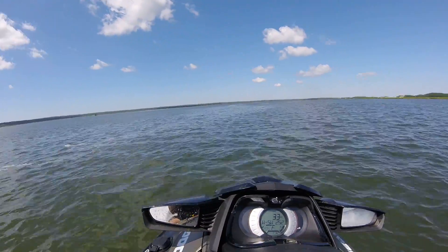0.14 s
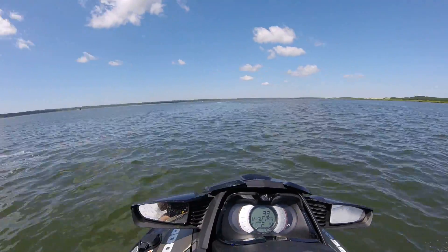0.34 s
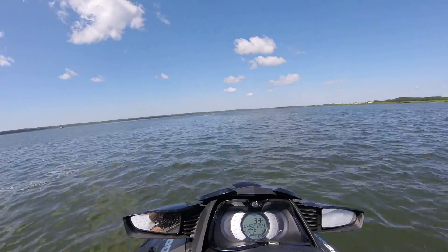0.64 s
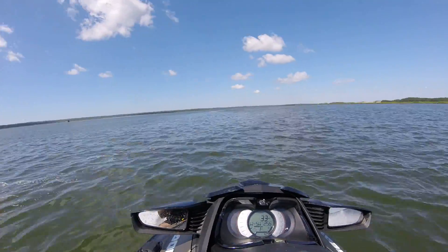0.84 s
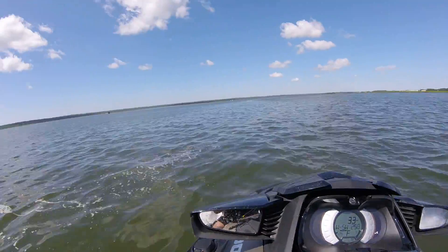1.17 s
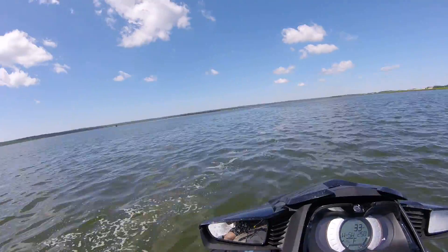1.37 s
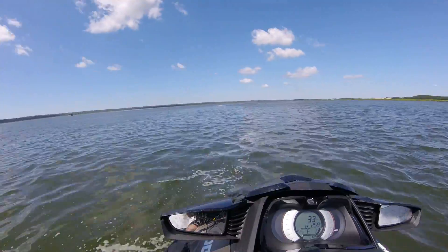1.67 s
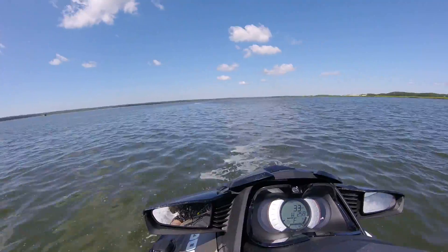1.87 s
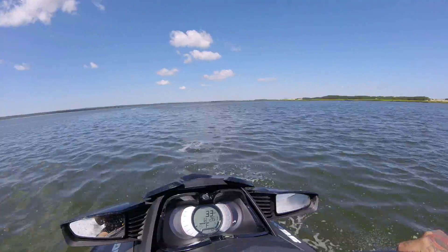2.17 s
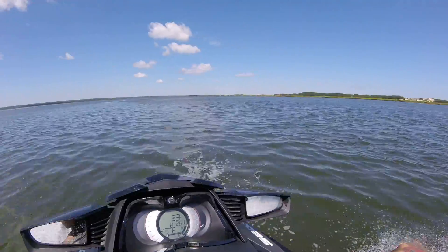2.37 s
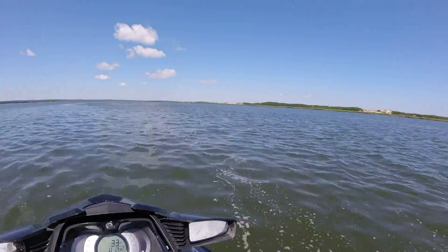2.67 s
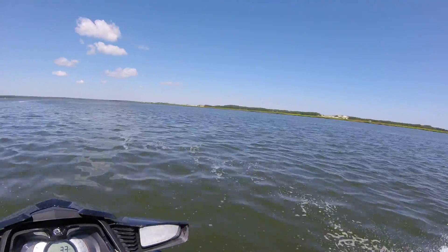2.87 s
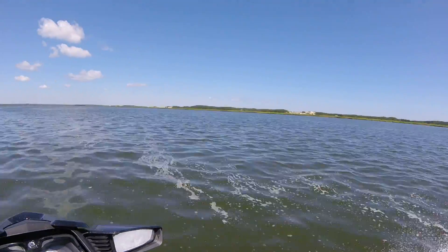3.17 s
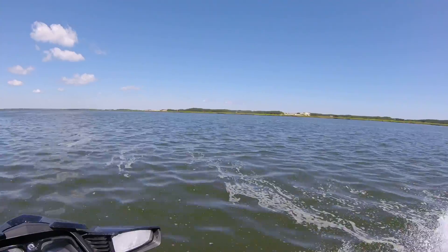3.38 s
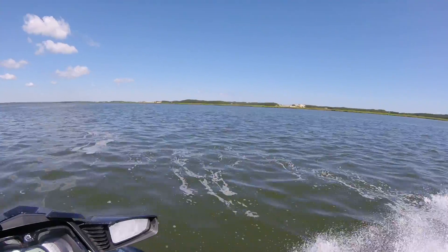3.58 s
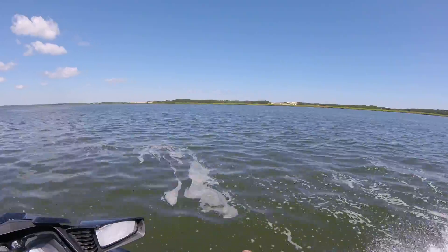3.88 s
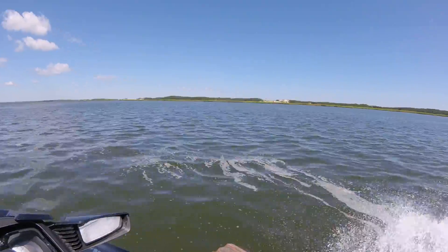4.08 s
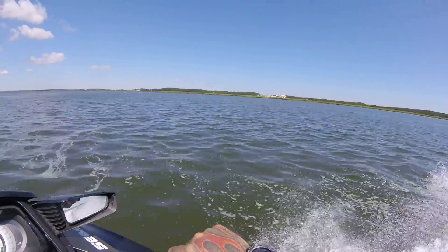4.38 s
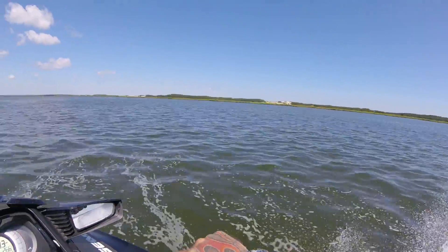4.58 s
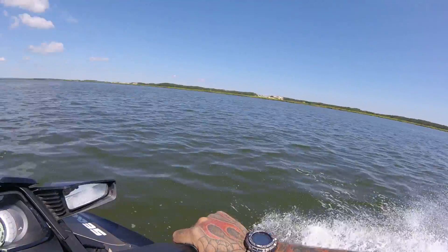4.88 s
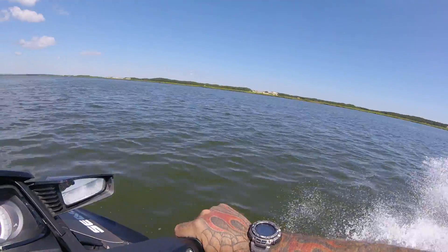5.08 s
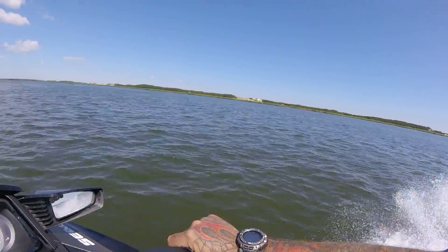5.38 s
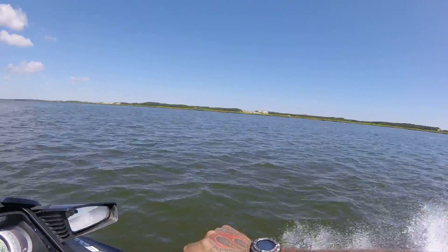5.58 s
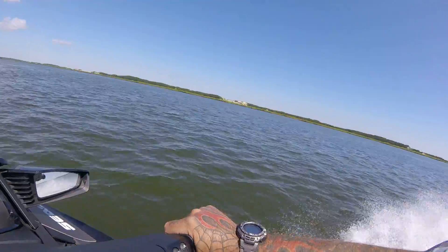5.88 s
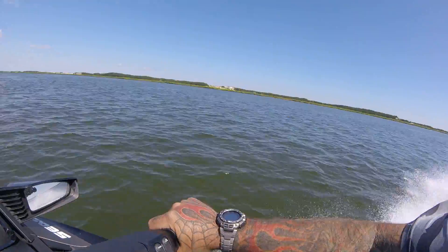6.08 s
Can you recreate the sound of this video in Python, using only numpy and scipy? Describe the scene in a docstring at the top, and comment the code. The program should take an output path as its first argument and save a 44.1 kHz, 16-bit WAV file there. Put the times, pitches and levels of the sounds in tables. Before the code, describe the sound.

A personal watercraft engine drones steadily over open water, with wind thumping the microphone, brief dry rattles and bursts of hissing spray.

```python
"""A three-cylinder personal watercraft engine drones at a steady cruise, heard from the rider's head. Sine
engine orders sound over noise-built exhaust roar, hull wash, spray, whistling hiss and fizz. Wind is low noise
with hard thumps; dry ticks rattle early on; splashes swell the roar and water noise. At 4.15 s the head turns
aside: engine and treble are shaded, and wind buffets the microphone more."""
import sys
import numpy as np
from scipy import signal
from scipy.fft import rfft, irfft
from scipy.io import wavfile
from scipy.ndimage import uniform_filter1d

SR = 44100
rng = np.random.default_rng(int(sys.argv[2]) if len(sys.argv) > 2 else 0)


def put_to_file(sound):
    """Save the sound as 16-bit audio at rate SR, in the file named by the first command-line argument."""
    columns = np.atleast_2d(sound).T  # one column per channel
    safe = np.clip(columns, -1, 1)
    whole_steps = np.round(safe * 32767)
    wavfile.write(sys.argv[1], SR, whole_steps.astype(np.int16))


N = 275184
TIME_S = np.arange(N) / SR

# Levels are those entering record().
# engine levels: (time [s], second crank order [dB], third crank order [dB], airborne orders [dB])
DRONE_LEVELS = [(0, -22, -15.5, -34.5), (.1, -19.5, -17, -26.5), (.4, -18.5, -17.5, -27),
                (.7, -18.5, -17, -26), (1.1, -18, -18, -27), (1.35, -26.5, -22, -24.5),
                (1.67, -16.5, -18, -26), (1.95, -20, -20, -24.5), (2.15, -17.5, -16.5, -24.5),
                (2.65, -22, -18.5, -31), (3.3, -19.5, -19, -32), (3.7, -22, -18.5, -34.5),
                (4.03, -22.5, -17.5, -28), (4.12, -21, -19, -34), (4.22, -29, -25, -39),
                (4.65, -25, -21.5, -42), (5.1, -28, -21, -39), (5.45, -22, -21, -36),
                (5.6, -26.5, -25, -32), (5.77, -25, -22, -39), (6.03, -26.5, -21.5, -34),
                (6.24, -25, -25, -47)]
# weaker low orders: (multiple of cycle rate, level re slow trend of second crank order [dB])
LOW_ORDERS = [(3, -8), (5, -17)]
# airborne orders: (multiple of cycle rate, level re airborne level [dB])
AIR_ORDERS = [(8, -2), (9, -4.5), (10, -17), (12, -19.5), (13, -24), (14, -16.5), (16, -23.5), (17, -24),
              (19, -25), (20, -26), (25, -28)]
# water and exhaust beneath the splashes: (time [s], exhaust roar [dB], hull wash [dB])
RUSH_LEVELS = [(0, -37, -47.5), (.6, -34.5, -47), (.9, -36.5, -47), (1.2, -33.5, -43), (1.5, -37.5, -45.5),
               (1.95, -33, -40), (2.2, -35, -43.5), (2.95, -35, -47), (3.4, -32, -47.5), (3.55, -37, -49),
               (4.12, -33, -47), (4.25, -38, -52), (4.9, -39, -50.5), (5.7, -36.5, -50), (5.84, -40.5, -48),
               (5.93, -32, -46), (6.24, -38.5, -51)]
# wind on the microphone: (time [s], level [dB])
WIND_LEVELS = [(0.0, -23), (0.19, -27), (0.59, -27.5), (1.18, -24.5), (1.51, -24.5), (2.22, -23.5),
               (2.83, -22.5), (3.18, -27), (3.34, -19), (3.67, -23), (4.31, -20), (4.5, -19), (4.69, -24.5),
               (5.47, -17.5), (5.7, -20), (5.87, -23), (6.07, -18.5), (6.24, -22)]
# sheets of spray thrown past the microphone: (start [s], length [s], spray [dB],
# then re spray: low roar [dB], wash [dB], hiss [dB])
SPLASHES = [(1.873, 0.2, -54, 12, 1, 1), (2.202, 0.11, -42, 12.5, 1, -1), (2.27, .2, -41.5, 13.5, 7, -1.5),
            (2.442, 0.2, -42, 11, 4, -4), (2.59, 0.18, -41.5, -5, 4, -8), (2.724, .14, -44.5, 5, 7.5, -0.5),
            (2.858, 0.075, -43, 10, -2, -2), (2.92, 0.23, -58, 6, -1, 8), (3.425, .035, -57, 24, 0, -3),
            (4.17, .06, -51, 10, -2, -13), (4.273, 0.2, -48.5, 0, -5, -12), (4.436, .2, -53.5, 0, -9, -6),
            (4.996, 0.18, -47, 5, -0.5, -16), (5.15, .15, -45, 4, 2, -16), (5.27, 0.14, -42, 0, 1.5, -12),
            (5.375, 0.17, -45.5, 1, -0.5, -10), (5.465, 0.16, -41.5, 5, 1, -15),
            (5.601, 0.14, -42.5, 0, -3, -12), (5.838, 0.054, -48, -1, 0, -9),
            (5.933, 0.085, -43.5, 6, -3, -8), (5.996, 0.074, -49, 15, 0, -4), (6.047, 0.13, -46, 1, 1, -7),
            (6.135, .2, -42.5, 10.5, -2, -5.5)]
# small dry ticks, perhaps a plastic part rattling: (peak time [s], envelope peak [dB], pitch [Hz])
RATTLES = [(0.44, -33, 2520), (0.455, -34, 2200), (0.4654, -36, 2300), (0.5317, -41, 2660),
           (0.592, -31, 2410), (0.9926, -35, 2460), (1.0151, -35, 2650), (1.033, -30, 2340),
           (1.04, -34, 2400), (1.058, -32, 2500), (1.0804, -38, 2730), (1.9275, -27, 2640),
           (1.975, -32, 2380), (2.003, -28, 2360), (2.03, -28, 2660), (2.162, -29, 2660),
           (2.1806, -24, 2840)]
# single hard thumps of wind: (peak time [s], envelope peak [dB], pitch [Hz], bell time constant [s])
THUMPS = [(0.779, -17, 87, 0.016), (1.149, -14.5, 57, 0.026), (2.639, -16.5, 58, 0.028),
          (3.199, -13, 37.7, 0.026), (3.499, -12, 26.7, 0.021), (3.759, -15, 26.9, 0.018),
          (3.929, -17, 80, 0.023), (4.139, -8.5, 94, 0.01), (4.209, -7.5, 35.0, 0.014),
          (4.279, -9, 80.7, 0.011), (4.309, -11.5, 35.0, 0.021), (4.389, -16.5, 37.7, 0.037),
          (4.879, -15, 58, 0.016), (5.019, -9.5, 32.8, 0.016), (5.289, -9.5, 94.2, 0.01),
          (5.469, -7, 55, 0.015), (5.499, -17, 26.7, 0.016), (5.619, -9, 59.7, 0.012),
          (5.679, -12, 50.5, 0.027), (5.939, -18, 48, 0.046), (6.039, -3, 76.5, 0.011),
          (6.099, -14, 43.1, 0.022)]

# Noise colours, each: (frequency [Hz], relative spectral density [dB per Hz])
# low engine noise
RUMBLE_COLOUR = [(70, -17), (120, -0.5), (165, -4.5), (215, 2), (260, -0.5), (310, -7), (450, -14),
                 (600, -38)]
# rings of the engine cover
CASING_COLOUR = [(1000, -18.5), (1120, -5), (1160, -2.5), (1210, -17.5), (1330, -10), (1450, 1.5),
                 (1540, -2), (1700, -26.5)]
# exhaust roar
ROAR_COLOUR = [(150, -18.5), (330, -2.5), (500, 1), (900, -5.5), (1300, -14), (2000, -37)]
# hull wash
WASH_COLOUR = [(600, -23.5), (1000, 2.5), (1450, 1), (1800, 1), (2400, -6), (3200, -21.5)]
# spray
SPRAY_COLOUR = [(1000, -20.5), (1900, -0.5), (2800, 4), (3600, -1.5), (5000, -6.5), (7000, -19.5),
                (9000, -31), (12000, -54)]
# hiss with a whistle near 6.5 kHz, perhaps the microphone port ringing
HISS_COLOUR = [(3000, -19), (4300, -8.5), (4800, -3.5), (5700, -5.5), (6200, -2.5), (6500, 2), (6800, -6.5),
               (7500, -18), (9000, -38)]
# finest spray
FIZZ_COLOUR = [(6500, -19), (7500, -2), (9300, -10), (10200, -17.5), (11000, -15), (12000, -29)]
# wind eddies
BUFFET_COLOUR = [(10, -7), (22, -0.5), (50, 1), (90, -2.5), (130, -6.5), (250, -12.5), (500, -30)]
# small ticks around each rattle
CHATTER_COLOUR = [(1700, -26), (2100, -6), (2500, 4), (2900, -6.5), (3400, -29)]

CYCLE_HZ = 46.63  # mean four-stroke cycle rate
TURN_S, TURN_LASTS_S = 4.15, 0.1
SPRAY_DB, HISS_DB, FIZZ_DB = -51.5, -49.5, -62.5
SPRAY_SHADE_DB, HISS_SHADE_DB, FIZZ_SHADE_DB = -3, -8, -8.5  # added by the turn
SPLASH_RISE_S, SPLASH_FALL_S, SPLASH_SAG_DB_PER_S = 0.029, 0.025, -7
SPLASH_FIZZ_DB = -29  # re splash spray
TICK_S = 0.0012  # bell time constant
EDGE_HZ = 12000
WANDER_RATE_HZ = 200  # points per second


def gain_of(db):
    """Amplitude gain of a level in dB."""
    return 10 ** (np.asarray(db) / 20)


def summed_db(*levels_db):
    """Level of unrelated noises together: their powers add."""
    return 10 * np.log10(sum(gain_of(db) ** 2 for db in levels_db))


def evened(x):
    """Scale to rms 1."""
    return x / np.sqrt(np.mean(x ** 2) + 1e-20)


def curves(rows):
    """Table columns joined by straight lines in time."""
    times_s, *columns = np.transpose(rows)
    return [np.interp(TIME_S, times_s, column) for column in columns]


def wander(top_hz):
    """Slow random curve of rms 1 with nothing at or above top_hz."""
    count = int(N / SR * WANDER_RATE_HZ) + 2
    spectrum = rfft(rng.standard_normal(count))
    below_top = np.fft.rfftfreq(count, 1 / WANDER_RATE_HZ) < top_hz
    slow = irfft(spectrum * below_top, count)
    return np.interp(TIME_S * WANDER_RATE_HZ, np.arange(count), evened(slow))


def noise(colour, size, patchy_db, flicker_db, band_hz):
    """Random short-time spectra with drifting patches and shared flicker; about rms 1 in band_hz."""
    frames, hz = 4 * N // size + 5, np.fft.rfftfreq(size, 1 / SR)
    real, imag, patches = rng.standard_normal((frames, len(hz), 3)).T
    patches = uniform_filter1d(patches, size=size // 64, axis=0)  # smooth over frequency
    patches = evened(uniform_filter1d(patches, size=5, axis=1))  # smooth over time
    flicker = evened(uniform_filter1d(rng.standard_normal(frames), size=3))

    colour_hz, colour_db = np.transpose(colour)
    shape = gain_of(np.interp(np.log(hz + 1), np.log(colour_hz), colour_db, -90, -90))
    modulation = gain_of(patchy_db * patches + flicker_db * flicker)
    spectra = (real + 1j * imag) * shape[:, None] * modulation
    sound = evened(signal.istft(spectra, nperseg=size, noverlap=size - size // 4)[1][:N])
    inside = (hz > band_hz[0]) & (hz < band_hz[1])
    return sound * np.sqrt((shape ** 2).sum() / (shape[inside] ** 2).sum())


def bursts(rows):
    """Cosine swings of random phase, each under a bell curve peaking at its time."""
    half = SR // 10
    out, t_s = np.zeros(N + SR), (np.arange(SR // 5) - half) / SR
    phases = rng.random((len(rows), 1))  # cycles
    for (peak_s, db, hz, bell_s), phase in zip(rows, phases):
        bell = gain_of(db) * np.exp(-(t_s / bell_s) ** 2)
        swing = bell * np.cos(2 * np.pi * (hz * t_s + phase))
        out[round(peak_s * SR) - half:][:len(t_s)] += swing
    return out[:N]


def turned():
    """Head turn: 0 facing forward, 1 turned aside."""
    return np.clip((TIME_S - TURN_S) / TURN_LASTS_S, 0, 1)


def order(multiple, cycles, waver_db):
    """One engine order: a sine that uneven firing makes waver in level and in phase."""
    phase_waver = 0.11 * waver_db * wander(14)  # rad
    angle = 2 * np.pi * (multiple * cycles + rng.random()) + phase_waver
    return np.sqrt(2) * np.sin(angle) * gain_of(waver_db * wander(18))


def orders(rows, cycles, waver_db):
    """Sum of the orders in a table."""
    return sum(gain_of(db) * order(multiple, cycles, waver_db) for multiple, db in rows)


def engine(cycles):
    """Drone: two strong hull-borne crank orders, with weaker orders and rough noise around them."""
    second_db, third_db, air_db = curves(DRONE_LEVELS)
    # second order and airborne parts flutter more after the turn
    flutter_db = (0.39 + 2.2 * turned()) * wander(11)
    second_gain = gain_of(second_db + flutter_db)
    third_gain = gain_of(third_db + 0.37 * wander(5))
    # two crank turns per cycle: crank orders 2 and 3 are cycle multiples 4 and 6
    strong = second_gain * order(4, cycles, 1.3) + third_gain * order(6, cycles, 0.6)

    low = orders(LOW_ORDERS, cycles, 1.4)
    rumble = gain_of(-4.0) * noise(RUMBLE_COLOUR, 2048, 0.97, 1.0, (100, 400))
    load_db = uniform_filter1d(second_db, size=SR // 4)  # slow trend only

    air = orders(AIR_ORDERS, cycles, 1.1)
    casing = gain_of(-20.0) * noise(CASING_COLOUR, 2048, 2.0, 0.4, (1000, 1700))
    air_flutter_db = (0.46 + 1.3 * turned()) * wander(8.8)
    return strong + (low + rumble) * gain_of(load_db) + (air + casing) * gain_of(air_db + air_flutter_db)


def rush(cycles):
    """Roar and hiss throb faintly with each crank turn and firing; wash, spray and fizz flicker freely."""
    roar_db, wash_db = curves(RUSH_LEVELS)
    surge = wander(14)  # shared unevenness
    splash_db, low_db, body_db, high_db = splashes() + 0.52 * surge
    roar_db = summed_db(roar_db + 0.6 * wander(14), low_db)
    wash_db = summed_db(wash_db + 0.5 * wander(6), body_db)
    spray_db = summed_db(SPRAY_DB + SPRAY_SHADE_DB * turned() + 0.53 * surge, splash_db)
    hiss_db = summed_db(HISS_DB + HISS_SHADE_DB * turned() + 0.17 * surge, high_db)
    fizz_db = summed_db(FIZZ_DB + FIZZ_SHADE_DB * turned(), splash_db + SPLASH_FIZZ_DB)

    # two crank turns and three firings per cycle
    throb = np.cos(4 * np.pi * cycles) + 0.7 * np.cos(6 * np.pi * cycles)
    roar = noise(ROAR_COLOUR, 1024, 0.9, 0.6, (480, 1100)) * (1 + 0.07 * throb)
    wash = noise(WASH_COLOUR, 512, 0.95, 0.46, (1300, 2000))
    spray = noise(SPRAY_COLOUR, 256, 1.0, 0.61, (2900, 4400))
    hiss = noise(HISS_COLOUR, 256, 1.1, 0.7, (5000, 7200)) * (1 + 0.035 * throb)
    fizz = noise(FIZZ_COLOUR, 256, 1.4, 0.6, (7800, 11000))
    water = gain_of(wash_db) * wash + gain_of(spray_db) * spray + gain_of(fizz_db) * fizz
    return gain_of(roar_db) * roar + gain_of(hiss_db) * hiss + water


def wind():
    """Lumpy low pressure swings of eddies at the microphone port, plus hard thumps."""
    level_db, = curves(WIND_LEVELS)
    eddies = noise(BUFFET_COLOUR, 4096, 0.31, 0.25, (20, 120))
    power = uniform_filter1d(eddies ** 2, size=SR // 8)
    eddies = eddies / (power + 0.033) ** 0.08  # mild levelling; WIND_LEVELS set the slow strength
    return gain_of(level_db) * eddies + bursts(THUMPS)


def rattles():
    """Dry ticks, each set in a soft noise chatter that follows their smoothed power."""
    ticks = bursts([(*row, TICK_S) for row in RATTLES])
    power = uniform_filter1d(uniform_filter1d(ticks ** 2, size=1100), size=700)
    chatter = noise(CHATTER_COLOUR, 256, 1.1, 2.0, (1700, 3400))
    return ticks + gain_of(-3.5) * np.sqrt(abs(power)) * chatter


def splashes():
    """Levels [dB] in spray, roar, wash and hiss: each splash rises, sags slowly and is cut short."""
    power = np.full((4, N), 1e-12)
    for start_s, length_s, db, *against_db in SPLASHES:
        t_s = TIME_S - start_s
        shape = np.clip(np.minimum(t_s / SPLASH_RISE_S, (length_s - t_s) / SPLASH_FALL_S), 0, 1)
        spray = shape * gain_of(db + SPLASH_SAG_DB_PER_S * np.clip(t_s, 0, length_s))
        power = power + (gain_of([0, *against_db])[:, None] * spray) ** 2
    return 10 * np.log10(power)


def scene():
    """Sum all sources; engine and rush share one cycle count."""
    cycles = CYCLE_HZ * TIME_S + 0.021 * wander(1.5)  # speed hunts a little
    return (engine(cycles) + rush(cycles) + wind() + rattles())[None]


def record(dry):
    """Squeeze peaks softly, then low-pass at EDGE_HZ."""
    squeezed = 0.82 * np.tanh(dry / 0.92)
    lowpass = signal.firwin(511, EDGE_HZ, window=("kaiser", 9), fs=SR)
    return signal.oaconvolve(squeezed, lowpass[None], "same")


dry = scene()
out = record(dry)
put_to_file(out)
```